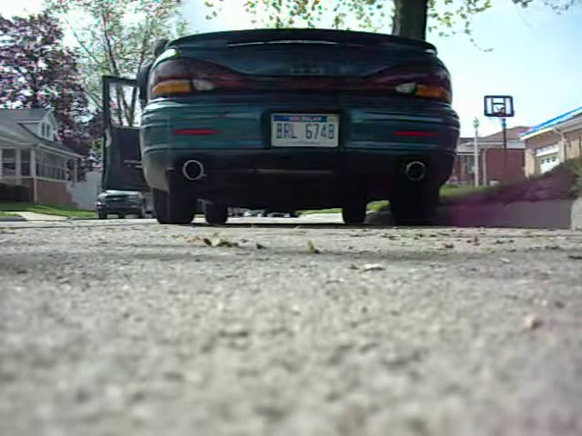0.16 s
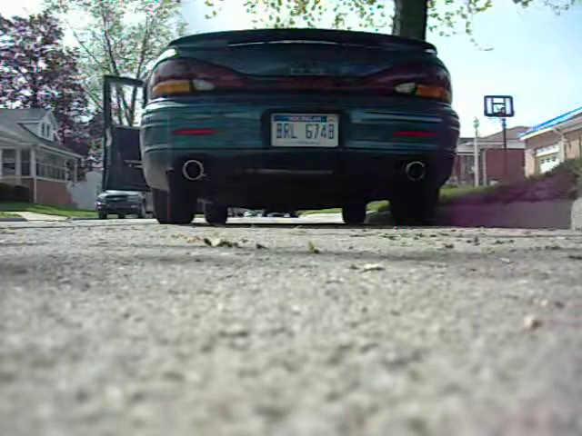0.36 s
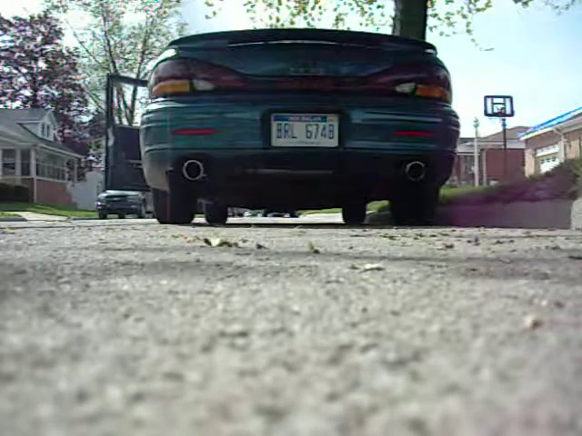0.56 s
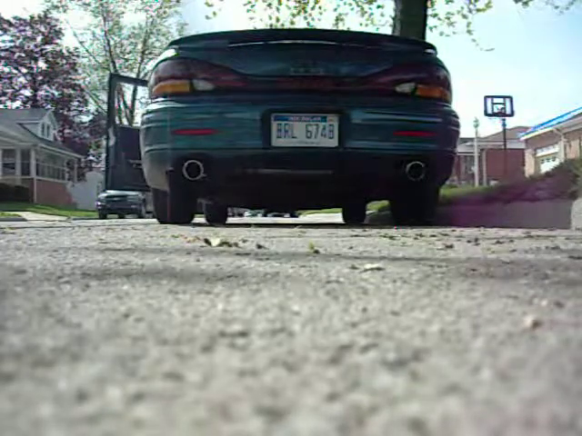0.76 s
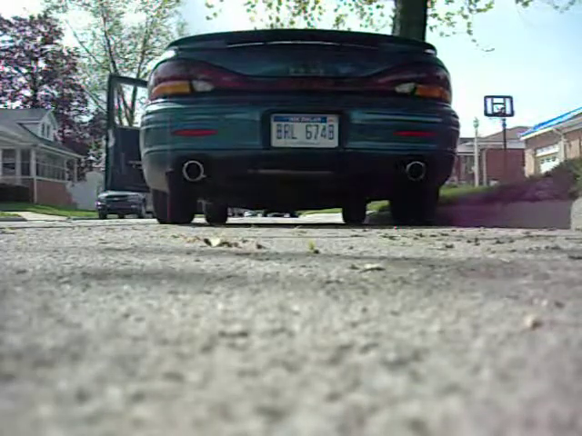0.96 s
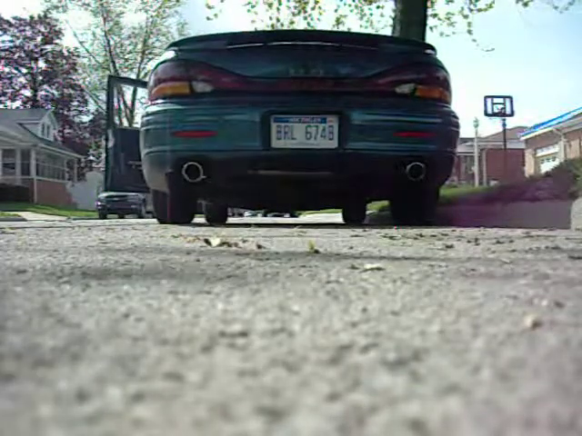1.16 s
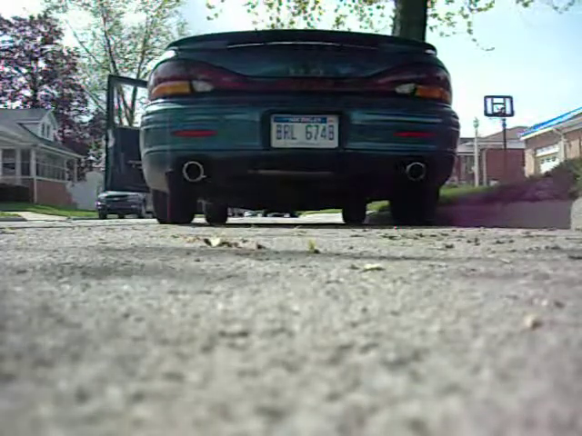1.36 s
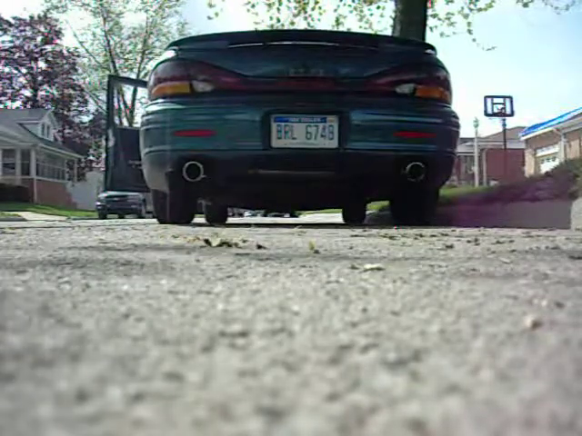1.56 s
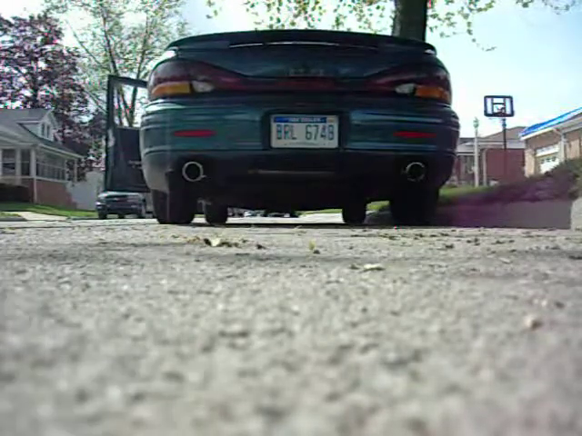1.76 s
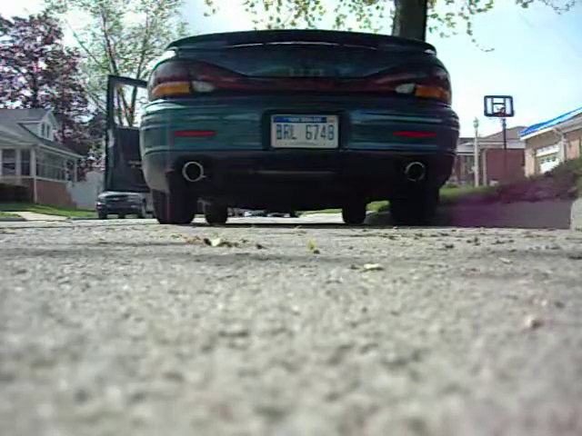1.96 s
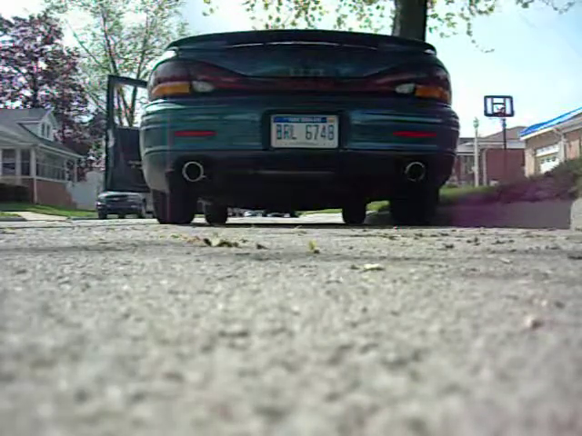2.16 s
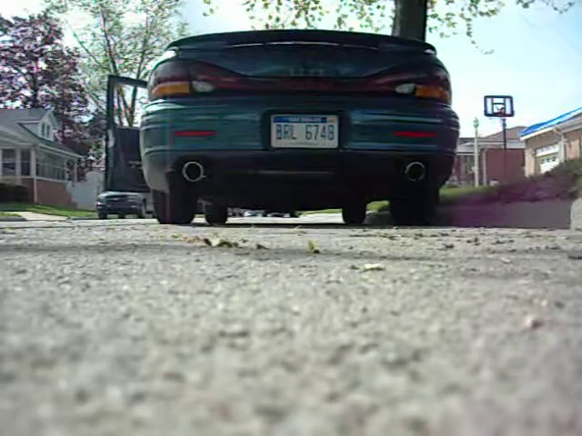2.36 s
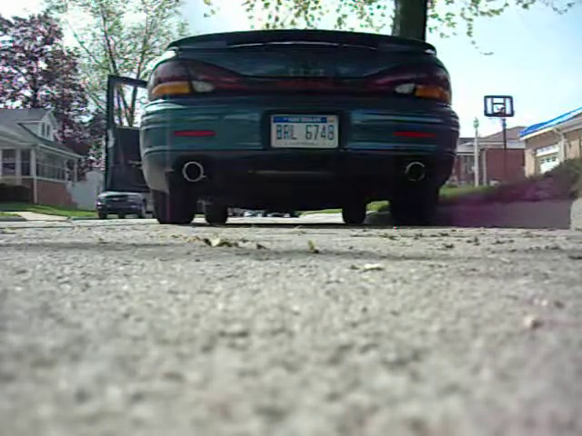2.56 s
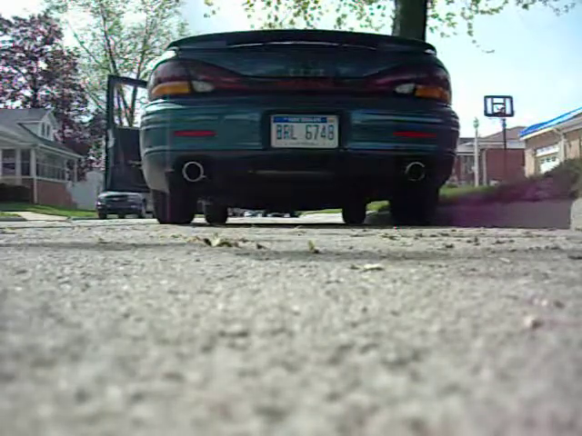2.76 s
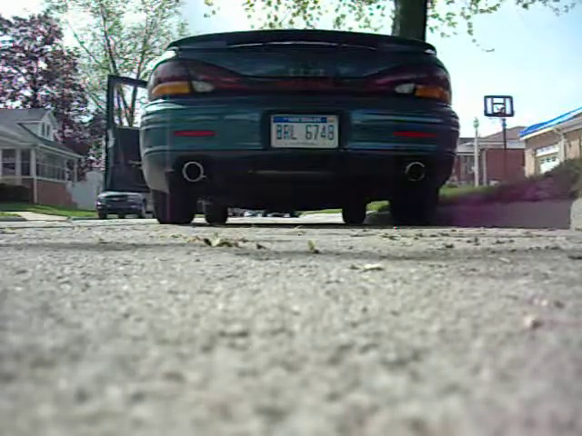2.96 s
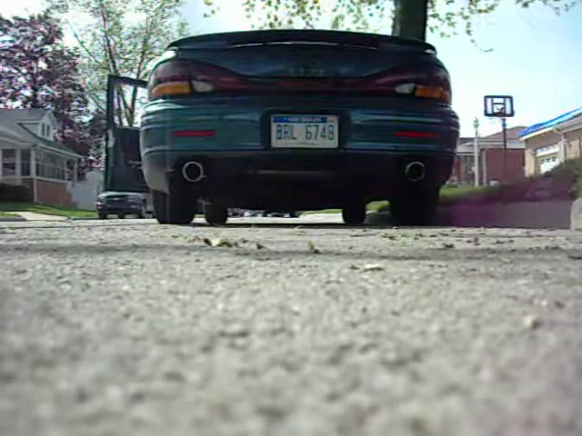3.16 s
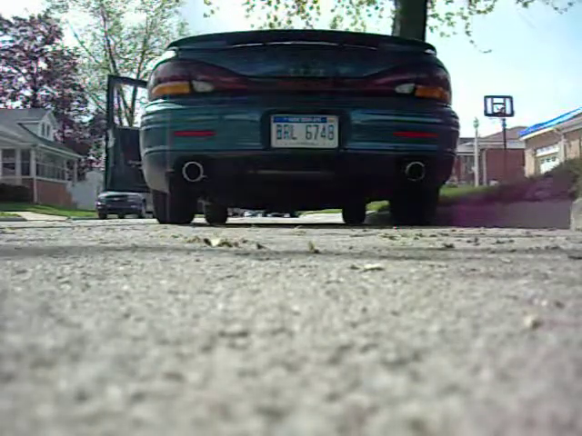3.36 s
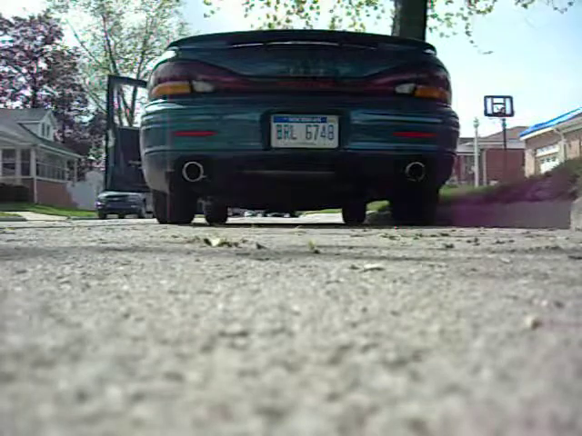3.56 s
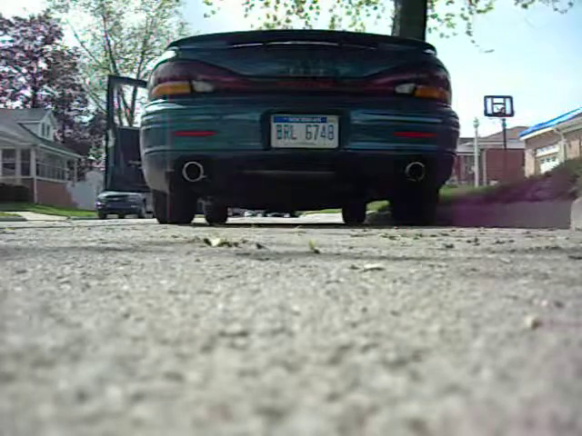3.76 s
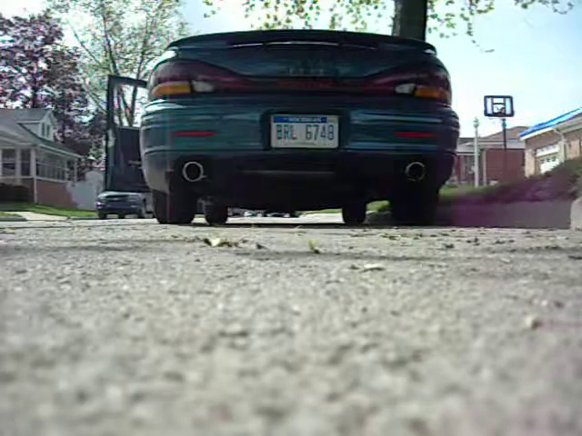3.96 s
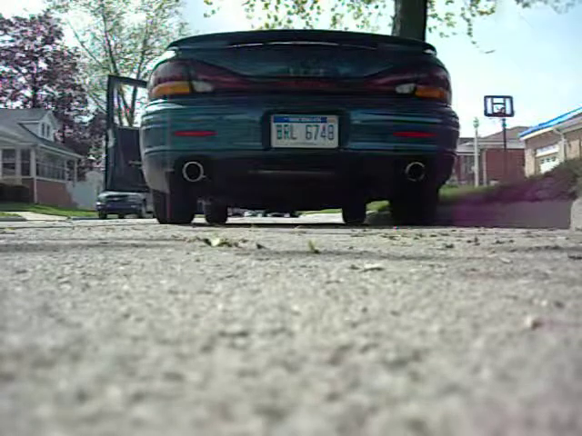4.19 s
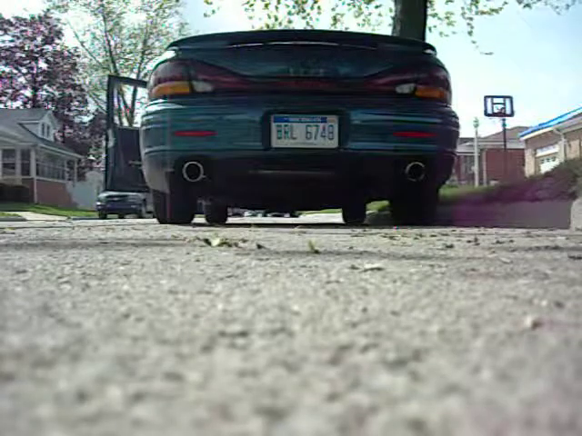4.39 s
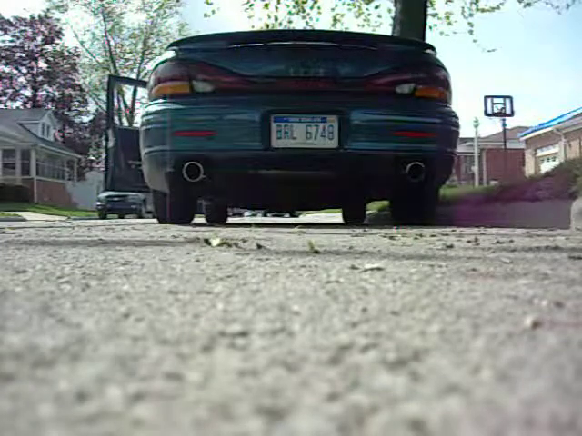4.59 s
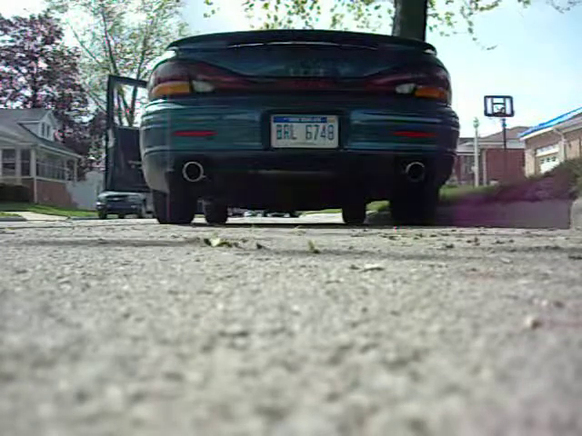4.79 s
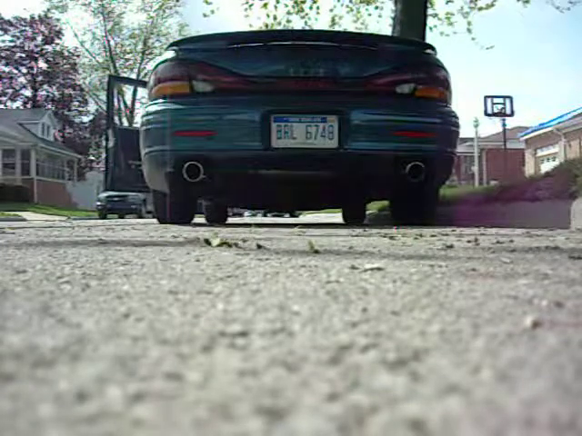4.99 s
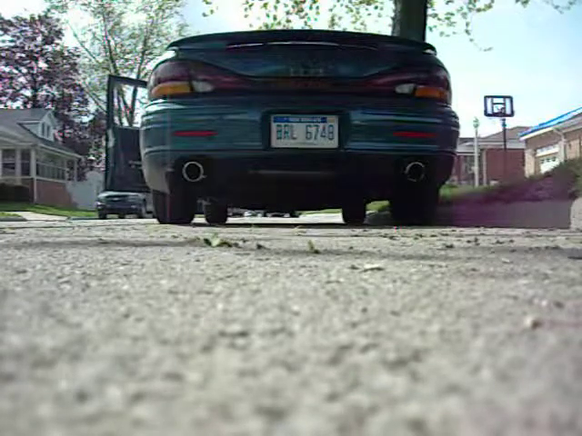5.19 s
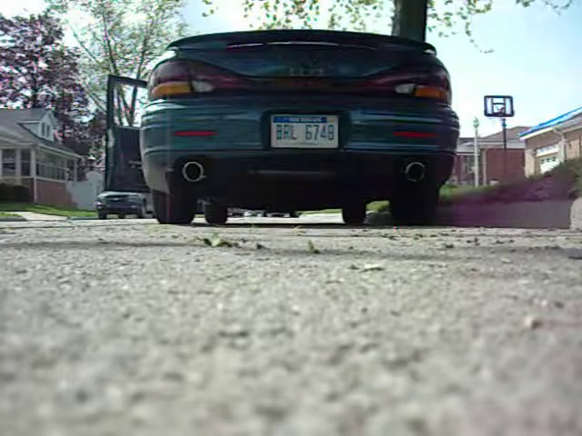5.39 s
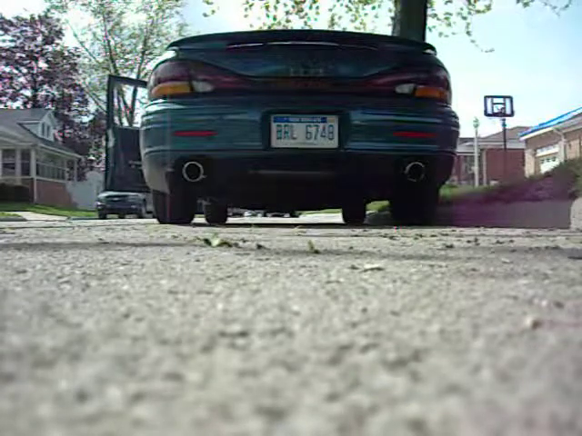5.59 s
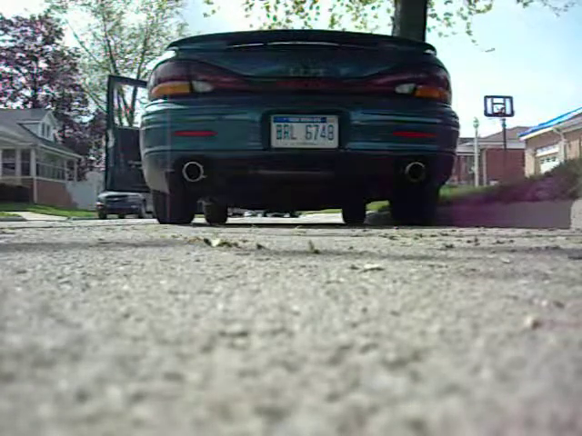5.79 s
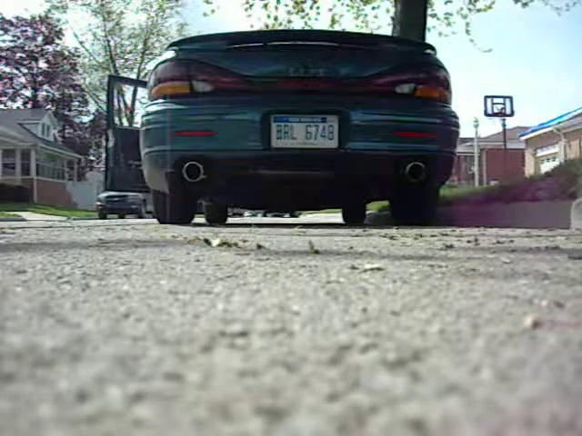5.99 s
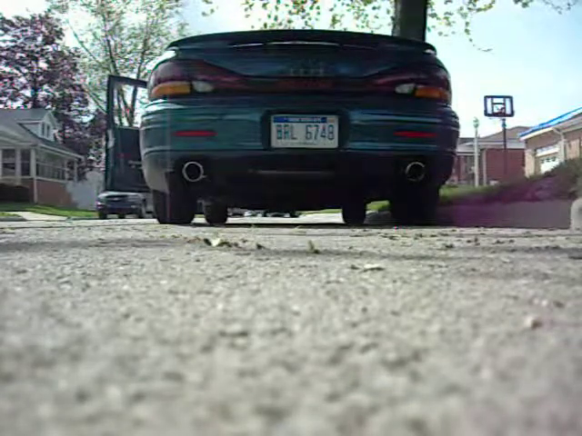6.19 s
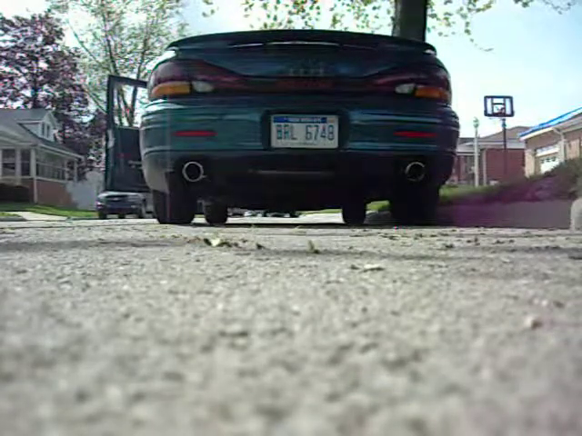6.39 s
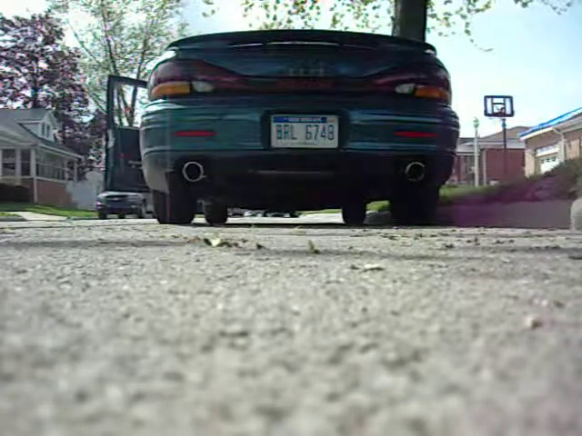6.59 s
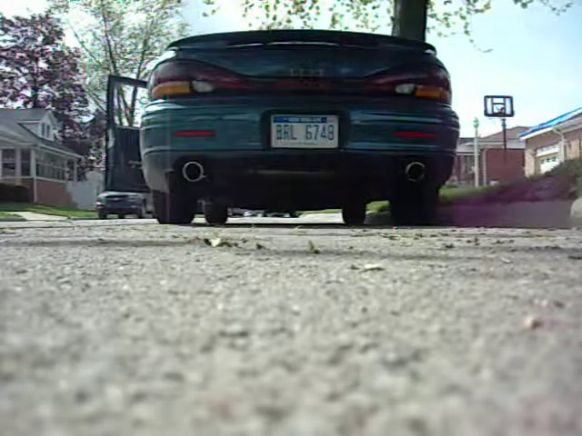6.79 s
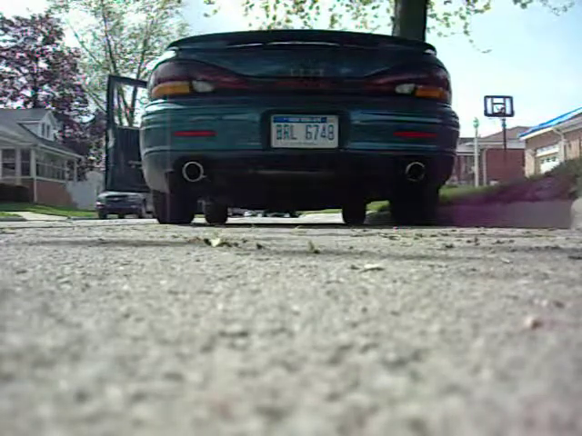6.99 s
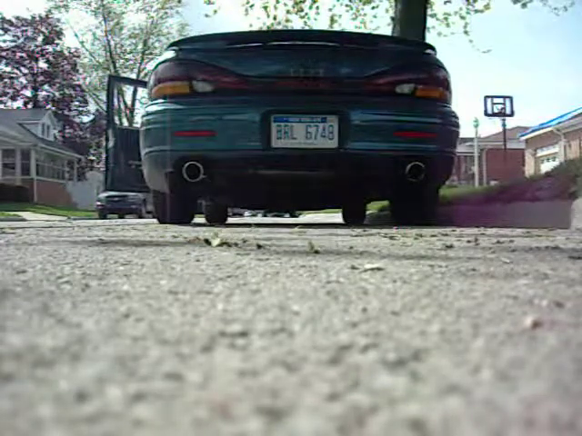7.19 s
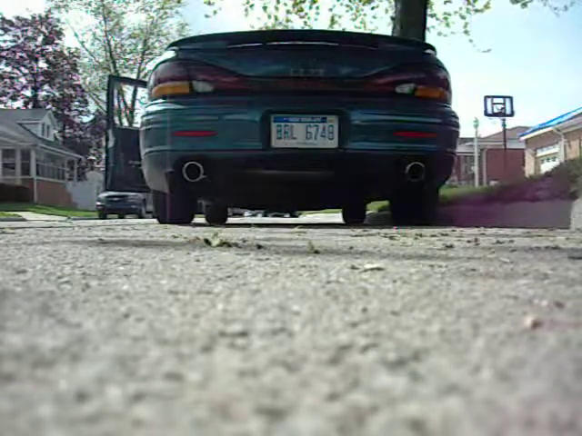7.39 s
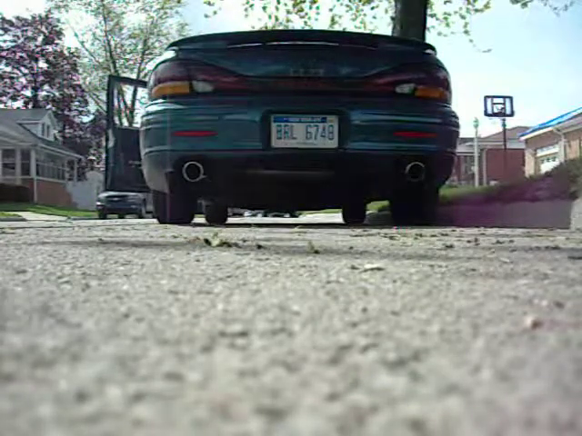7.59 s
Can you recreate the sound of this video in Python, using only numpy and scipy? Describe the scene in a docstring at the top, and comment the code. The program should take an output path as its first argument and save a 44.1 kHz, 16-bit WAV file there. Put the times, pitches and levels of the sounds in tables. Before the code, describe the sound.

A quiet street opens with faint town hum, a light breeze on the microphone, a few small clicks and thin bird chirps through the first 1.7 seconds. From about 1.7 to 2 seconds keys click and a fuel pump gives a soft, short whirr. At 2.6 seconds the car's starter engages with a knock and cranks with a pulsing, grinding whine. The engine catches at about 3.1 seconds and flares into a loud, raspy boom, peaking near 3.5 seconds with slight distortion. As the revs drop, the exhaust burbles and gives two quick thudding pops around 3.7 seconds. By 4.5 seconds it has settled into a deep, throbbing fast idle with a light hiss, running until the end at about 7.6 seconds. Wind puffs softly near 6 seconds, and faint chirps return around 4.3 and 7 seconds. The microphone is low behind the tailpipes and picks up little treble.

```python
"""A quiet street, on the ground behind the twin tailpipes of a six-cylinder car.
Over town hum and a breeze, keys click, birds whistle and the fuel pump whirrs. The starter's gears grind
and whine; the engine catches, flares, burbles and settles to a fast idle. Its firings boom in the exhaust
and rasp down the pipes, and late burns thud in the muffler.
The microphone hears little treble and clips on the loudest moments."""
import sys
import numpy as np
from scipy import signal
from scipy.fft import rfft, irfft, next_fast_len
from scipy.io import wavfile
from scipy.ndimage import uniform_filter1d, map_coordinates

SR = 44100
rng = np.random.default_rng(int(sys.argv[2]) if len(sys.argv) > 2 else 0)


def pcm_store(signal):
    """Save signal as 16-bit PCM."""
    levels = np.round(np.clip(np.atleast_2d(signal), -1, 1) * 32767)
    wavfile.write(sys.argv[1], SR, levels.astype(np.int16).T)


N = 337365
TIME = np.arange(N) / SR


def amp(db):
    """Decibels to gain."""
    return 10 ** (np.asarray(db) / 20)


def unit(x):
    """Scale to rms 1."""
    return x / np.sqrt(np.mean(x ** 2) + 1e-20)


def noise():
    """White noise of rms 1."""
    return rng.standard_normal(N)


def wobble(rate):
    """A smooth random curve, rate knots a second."""
    return map_coordinates(rng.standard_normal(int(N * rate / SR) + 4), [TIME * rate])


def envelope(start, length, attack, release):
    """A straight rise, a hold until start + length, then an exponential fall; all in seconds."""
    rise = np.clip((TIME - start) / attack, 0, 1)
    return rise * np.exp(-np.maximum(TIME - start - length, 0) / release)


def filtered(x, response):
    """Multiply the spectrum of x by a function of frequency."""
    size = next_fast_len(len(x) + 8192)
    return irfft(rfft(x, size) * response(np.fft.rfftfreq(size, 1 / SR)), size)[:len(x)]


def coloured(x, points):
    """EQ x through (f/Hz, level/dB) points on a log axis."""
    f, db = np.transpose(points)
    return filtered(x, lambda hz: amp(np.interp(np.log(hz + 1), np.log(f), db)))


def resonant(x, modes):
    """Ring x through (f/Hz, width/Hz, level/dB) resonances of alternating polarity."""
    def response(f):
        return sum((-1) ** k * amp(db) * 1j * f * width / (hz * hz - f * f + 1j * f * width)
                   for k, (hz, width, db) in enumerate(modes))
    return filtered(x, response)


def beats(phase):
    """Samples at which a phase passes whole numbers."""
    return np.flatnonzero(np.diff(np.floor(phase)) > 0)


def add(track, s, sound):
    """Mix a sound in at time s."""
    start = round(s * SR)
    track[start:start + len(sound)] += sound[:N - start]


def burst(hz, width_hz, t60):
    """A noisy ring that peaks at 1 and dies away."""
    t = TIME[:SR // 4]
    band = [(hz, width_hz, 0)]
    ring = resonant(resonant(rng.standard_normal(len(t)), band), band)
    ring *= amp(-60 * t / t60) * (1 - np.exp(-t * hz / 2))
    return ring / np.abs(ring).max()


def street(x, t60, wet_db):
    """House fronts scatter a short tail after the sound."""
    t = TIME[:SR]
    tail = rng.standard_normal(SR) * amp(-60 * t / t60) * (t > .008)
    return x + amp(wet_db) * signal.fftconvolve(x, tail / np.linalg.norm(tail))[:N]


# EQ of the distant town bed: f/Hz, level/dB
TOWN_EQ = [(15, -11.5), (25, -7), (43, -5), (228, -18), (258, -19.5), (439, -19.5), (604, -19.5),
           (658, -17.5), (1610, -23), (3450, -24), (4000, -25), (5200, -76), (8800, -120)]
# puffs of wind on the microphone: t/s, length/s, level/dB
GUSTS = [(.38, .14, -39), (.64, .1, -41), (1.15, .6, -35), (1.48, .1, -36), (1.7, .18, -32),
         (5.627, .06, -26), (5.742, .04, -24.5), (5.79, .05, -26), (5.852, .03, -25), (5.898, .08, -26.5),
         (5.995, .04, -24.5), (6.028, .05, -26.5), (6.83, .07, -28.5)]


def town_and_breeze():
    """Distant town noise, and a breeze that rumbles at the microphone; its harder puffs also flutter."""
    breeze, flutter_onset = amp(-49), amp(-28)
    gusts = np.zeros(N)
    for s, length, db in GUSTS:
        add(gusts, s, amp(db) * np.hanning(int(length * SR)))
    rumble = unit(coloured(noise(), [(8, -9), (30, 7), (70, -7), (150, -19), (400, -42.5), (1000, -68)]))
    flutter = unit(coloured(noise(), [(15, -8), (150, 2), (300, -8), (500, -22.5), (1000, -45)]))
    flutter *= flutter_onset * (gusts / flutter_onset) ** 3.1
    town = unit(coloured(noise(), TOWN_EQ)) * amp(-41 + .23 * wobble(10))
    return town + (breeze + gusts) * amp(1.5 * wobble(17)) * rumble + flutter


# small metal clicks: t/s, relative peak/dB, f/Hz, t60/s
KEY_CLICKS = [(0.168, -15.5, 2350, 0.014), (.173, -19, 2300, .022), (.1835, -14, 2630, 0.029),
              (1.676, -10, 3570, 0.035), (1.7304, -19.5, 2820, 0.061), (1.7624, -12, 3530, .045),
              (1.798, -32, 3380, 0.027), (1.8327, -22, 3530, 0.042), (1.88, -17.5, 3480, 0.054),
              (1.963, -10.5, 3660, 0.079), (2.008, -12.5, 3690, 0.076)]


def keys_and_pump():
    """Keys and switches click through the open door; the fuel pump primes with a soft whirr."""
    clicks = np.zeros(N)
    for s, db, hz, t60 in KEY_CLICKS:
        add(clicks, s, amp(db - 2.5) * burst(hz, width_hz=1300, t60=t60))
    priming = amp(-30.5) * envelope(start=1.665, length=.18, attack=.066, release=.11)
    pump_eq = [(700, -37), (1300, -14), (1550, -7), (2500, -5), (3500, -6), (4200, -14.5)]
    whirr = unit(coloured(noise(), pump_eq)) * amp(2.5 * wobble(200))
    return street(clicks + priming * whirr, t60=.39, wet_db=-17)


# chirps: t/s, length/s, start f/Hz, end f/Hz, level/dB
BIRD_NOTES = [(0.203, 0.039, 3800, 3440, -42), (.506, 0.019, 4300, 3410, -31),
              (.518, 0.024, 4050, 3910, -33.5), (0.681, 0.26, 3120, 2825, -43.5),
              (.689, 0.026, 3570, 3536, -30), (0.824, .013, 4160, 3860, -31.5),
              (0.925, 0.05, 3380, 3000, -37), (0.997, 0.042, 3930, 4010, -35),
              (1.056, 0.027, 4200, 3440, -30), (1.079, .034, 3940, 3230, -32),
              (1.269, 0.048, 4180, 3260, -35), (1.408, 0.052, 2660, 2610, -39.5),
              (1.417, 0.26, 3160, 2810, -43.5), (4.293, 0.058, 4150, 3470, -26.5),
              (7.07, .08, 4100, 3420, -27.5), (7.188, .04, 4100, 3410, -29)]


def birds():
    """Gliding, slightly buzzy whistles from the trees, scattered by leaves and walls."""
    song = np.zeros(N)
    for s, length, start_hz, end_hz, db in BIRD_NOTES:
        progress = np.linspace(0, 1, int(length * SR))
        pitch = start_hz + (end_hz - start_hz) * progress ** .85  # the glide flattens toward its end
        depth = .007 + .13 * abs(1 - end_hz / start_hz)  # wide glides quaver more
        quaver = depth * unit(uniform_filter1d(noise()[:len(progress)], size=100))
        whistle = np.sin(2 * np.pi * np.cumsum(pitch * (1 + quaver)) / SR)
        add(song, s, amp(db) * np.sqrt(2 * np.abs(np.sin(np.pi * progress))) * whistle)
    buzz = unit(amp(3 * wobble(600)))
    return street(song * buzz, t60=.32, wet_db=-6.5)


# the pinion slams in, labours over each compression, then overruns:
# t/s, length/s, attack/s, level/dB, whine f/Hz
STARTER_STROKES = [(2.617, .024, .008, -6.5, 3230), (2.738, 0.055, .022, -14.5, 3470),
                   (2.905, 0.037, .028, -15, 2900), (3.014, 0.027, .004, -10.5, 3120),
                   (3.088, 0.08, 0.017, -16.5, 3660), (3.23, 0.059, 0.033, -17, 3831)]
# ring of the starter's housing: f/Hz, width/Hz, level/dB
HOUSING_MODES = [(985, 64, -16), (1320, 18, -7.5), (1900, 84, -11.5), (2370, 24, -3), (3121, 120, 3.5),
                 (3640, 170, -11.5)]
# EQ of the gear grind: f/Hz, level/dB
GRIND_EQ = [(120, -80.5), (200, -36), (595, -26), (794, -19), (1100, -21), (1310, -12), (1450, -13.5),
            (1860, -6.5), (2550, -11), (3150, -6), (4000, -7), (5200, -42.5), (8800, -120)]
# dull knocks as the pinion engages and the first compressions heave: t/s, peak/dB, f/Hz, t60/s
CRANK_KNOCKS = [(2.623, -19.5, 209, 0.078), (2.761, -29.5, 58.06, 0.24), (2.885, -28.5, 69, .12),
                (3.05, -23.5, 62.5, 0.06)]


def starter():
    """The reduction gear whines and sags at each stroke; pinion teeth scrape and ring the housing."""
    release_s, sag_hz_per_s, cycles_per_tooth = .014, 7500, 8
    strain, whine_hz = np.zeros(N), np.full(N, STARTER_STROKES[0][-1])
    for s, length, attack, db, hz in STARTER_STROKES:
        strain += amp(db) * envelope(s, length, attack, release_s)
        sag_hz = sag_hz_per_s * np.minimum(TIME - s, length + release_s)
        whine_hz = np.where(TIME < s, whine_hz, hz - sag_hz)
    cycles = np.cumsum(whine_hz * (1 + .02 * wobble(200))) / SR
    strikes = beats(cycles / cycles_per_tooth)
    teeth = np.zeros(N)
    teeth[strikes] = amp(2.9 * rng.standard_normal(len(strikes)))
    scrape = unit(teeth) + .9 * noise()
    grind = unit(unit(resonant(scrape, HOUSING_MODES)) + 1.2 * unit(coloured(scrape, GRIND_EQ)))
    chop = 1 + .35 * np.cos(2 * np.pi * cycles / cycles_per_tooth)  # the teeth give the whine side tones
    whine = unit(amp(2.5 * wobble(140)) * chop * np.sin(2 * np.pi * cycles))
    in_mesh = amp(-18.5) * envelope(start=2.607, length=.68, attack=.022, release=.016)
    out = (in_mesh + strain) * grind + .9 * strain * whine
    for s, db, hz, t60 in CRANK_KNOCKS:
        add(out, s, amp(db) * burst(hz, 1.3 * hz, t60))
    return street(out, t60=.24, wet_db=-11.5)


CATCH_S, CATCH_RISE_S, CATCH_SETTLE_S, IDLE_TURNS_PER_S = 3.075, .025, .1, 23

# body of the boom, before its EQ: multiple of crank speed, idle level/dB, boost at full effort/dB
BOOM_ORDERS = [(2, -14, 15), (3, -18.5, 9.5), (4, -19, 3.5)]
# EQ of the exhaust, with two low resonances: f/Hz, level/dB
BOOM_EQ = [(40, -10), (44, -7), (48.5, -0.5), (52, -4), (60, -4.5), (70, -5.5), (83, -9.5), (91, 1),
           (96, -3.5), (101, -10.5), (110, -12), (130, -14), (165, -15)]
# weak orders: multiple of crank speed, level against the 3rd order at idle/dB
WEAK_ORDERS = [(1, -28), (5, -12.5), (6, -18), (7, -16.5), (8, -32.5)]


def exhaust_boom(turns, speed, effort, uneven):
    """Unequal pipes from the two banks throb once a turn; low orders swell as they cross resonances."""
    eq_hz, eq_db = np.transpose(BOOM_EQ)
    orders = {round(k): db + effort_db * effort + np.interp(round(k) * speed, eq_hz, eq_db)
              for k, db, effort_db in BOOM_ORDERS}
    muffling_db = 10.5 * np.log2(speed / IDLE_TURNS_PER_S)  # the muffler holds weak orders back at speed
    orders |= {round(k): orders[3] + db - muffling_db for k, db in WEAK_ORDERS}
    tones = np.zeros(N)
    for k, db in orders.items():
        smear_rad = .13 * (k - 3) ** 2  # the muffler smears the orders in time
        waver = 1 + uneven * wobble(40)
        tones -= np.sqrt(2) * amp(db) * waver * np.sin(2 * np.pi * k * turns - smear_rad)
    # uneven firings fill the gaps between the orders
    burble_eq = [(10, -19), (25, -5), (45, 3), (75, 5.5), (130, -4), (220, -29), (500, -61.5)]
    burble = unit(coloured(noise(), burble_eq))
    lope = amp(.9 * wobble(14))
    return lope * tones + amp(-8.5) * uneven * burble


def cylinder_firings(turns, uneven):
    """Six unequal cylinders fire three times a turn: sharp pulses, and the gas puffs that trail them."""
    at = beats(3 * turns)
    strengths = np.resize([1.224, .79, 1.5, .98, 1.3, .42], len(at))
    firings = np.zeros(N)
    firings[at] = strengths * amp((.9 + 12 * uneven[at]) * rng.standard_normal(len(at)))
    puffs = signal.fftconvolve(firings, np.exp(-TIME[:SR // 20] / .012))[:N]
    puffs /= np.abs(uniform_filter1d(puffs, SR // 8)) + 1e-4  # hold their average near 1
    return unit(firings), puffs


# EQ of the tailpipe rasp: f/Hz, level/dB
RASP_EQ = [(100, -27), (160, -7.5), (215, -12.5), (255, -11), (300, -2), (345, -9.5), (405, 1.5), (465, 1),
           (520, -4), (605, 4), (680, 2.5), (760, -8.5), (950, -14), (1500, -26)]


def pipe_rasp(firings, puffs, speed, effort):
    """Firings bark down the pipe, whose note throbs; at speed the muffler's chamber turns it throaty."""
    bark = unit(coloured(.43 * firings + unit(noise() * (1 + .34 * puffs)), RASP_EQ))
    pipe_note = unit(resonant(firings + .8 * noise(), [(685, 45, 0)]) * amp(4 * wobble(17)))
    pipe = unit(bark + .45 * pipe_note)
    chamber = unit(resonant(firings + 1.604 * noise(), [(437, 130, 0)]))
    throaty = np.clip((speed - 25) / 32, 0, .45)
    catch_accent_db = 5 * np.exp(-np.abs(TIME - CATCH_S) / CATCH_SETTLE_S)
    level_db = -29.5 + 6 * np.log2(speed / IDLE_TURNS_PER_S) + 9 * effort + catch_accent_db
    return amp(level_db) * (np.sqrt(1 - throaty) * pipe + np.sqrt(throaty) * chamber)


# EQ of the gas hiss: f/Hz, level/dB
HISS_EQ = [(470, -22.5), (800, -4), (891, -11), (1010, -5.5), (1440, -7), (1560, -4), (1670, -7.5),
           (1870, -1), (2200, -6), (2740, -3.5), (3120, -4), (3710, -5), (3870, -10), (4000, -12.5),
           (5200, -31.5), (8800, -120)]


def gas_hiss(turns, puffs, speed, effort):
    """Gas hisses, ticking as twelve valves seat in every two turns, each with its own strength."""
    valve, since_seating = np.divmod(6 * turns, 1)
    ticks = rng.uniform(0, 1, size=12)[valve.astype(int) % 12] * np.exp(-since_seating / .3)
    hiss = unit(coloured(noise() * (1 + .088 * puffs + .82 * ticks), HISS_EQ))
    late_swell_db = 4 * np.maximum(TIME - 6.77, 0)
    level_db = -27 + 7.5 * np.log2(speed / IDLE_TURNS_PER_S) + 3 * effort + late_swell_db
    return amp(level_db + .36 * wobble(14)) * hiss


# the revs flare and settle: t/s, crank speed/(turns per s)
CRANK_SPEED = [(3.08, 20.0), (3.15, 22.13), (3.29, 36.43), (3.4, 40.97), (3.5, 42.85), (3.8, 32.5),
               (3.98, 27.47), (4.2, 25.43), (4.55, 23.41), (5.1, 22.07), (5.78, 22.96), (6.02, 22.46),
               (6.6, 22.98), (7.2, 23.99), (7.38, 23.73), (7.65, 24.95)]
# how hard the engine pulls: t/s, effort (1 open throttle, 0 idle, below 0 coasting)
ENGINE_EFFORT = [(3.08, .45), (3.12, .8), (3.21, 1), (3.5, .85), (3.57, -.22), (3.78, -.28), (3.98, -.12),
                 (4.1, 0)]


def engine():
    """Crank speed and effort drive boom, rasp and hiss; firings stumble while catching and coasting."""
    speed = np.interp(TIME, *np.transpose(CRANK_SPEED))
    effort = np.interp(TIME, *np.transpose(ENGINE_EFFORT))
    turns = .5 + np.cumsum(speed) / SR
    running_s = np.maximum(TIME - CATCH_S, 0)
    uneven = .05 + .3 * np.exp(-running_s / CATCH_SETTLE_S) + 1.1 * np.maximum(-effort, 0)
    boom = exhaust_boom(turns, speed, effort, uneven)
    firings, puffs = cylinder_firings(turns, uneven)
    rasp = pipe_rasp(firings, puffs, speed, effort)
    hiss = gas_hiss(turns, puffs, speed, effort)
    return np.minimum(running_s / CATCH_RISE_S, 1) * (boom + rasp + hiss)


# thuds in the muffler as the throttle shuts: t/s, peak/dB, f/Hz, t60/s
LATE_BURNS = [(3.652, -3, 460, 0.088), (3.727, -13, 425, 0.1)]


def muffler_pops():
    """Unburnt fuel goes off late in the muffler; each pop shoves a slow pressure wave out of the pipes."""
    thump_db, thump_hz, thump_t60 = -4.5, 44, .17
    t = TIME[:SR // 4]
    thump = amp(thump_db - 60 * t / thump_t60) * np.sin(2 * np.pi * thump_hz * t)
    out = np.zeros(N)
    for s, db, hz, t60 in LATE_BURNS:
        add(out, s, amp(db) * burst(hz, .53 * hz, t60) + thump)
    return out


def scene():
    """The car and the street, mixed to mono down on the asphalt."""
    return (engine() + muffler_pops() + starter() + birds() + keys_and_pump() + town_and_breeze())[None]


# the microphone's steep treble roll-off: f/Hz, level/dB
MICROPHONE_EQ = [(3750, 0), (4000, -3.5), (4250, -4.5), (4450, -15), (4650, -53), (4900, -100)]
# shelf that softens the distortion: f/Hz, level/dB
DISTORTION_EQ = [(4300, 0), (5200, -6.5), (9000, -6), (15000, -5.5)]


def record(dry):
    """A narrow-band microphone, then hard clipping that spits a little treble on the peaks."""
    ceiling, top_hz = .71, 15900
    clipped = np.clip(coloured(dry[0], MICROPHONE_EQ), -ceiling, ceiling)
    return filtered(coloured(clipped, DISTORTION_EQ), lambda hz: hz < top_hz)[None]


dry = scene()
out = record(dry)
pcm_store(out)
```